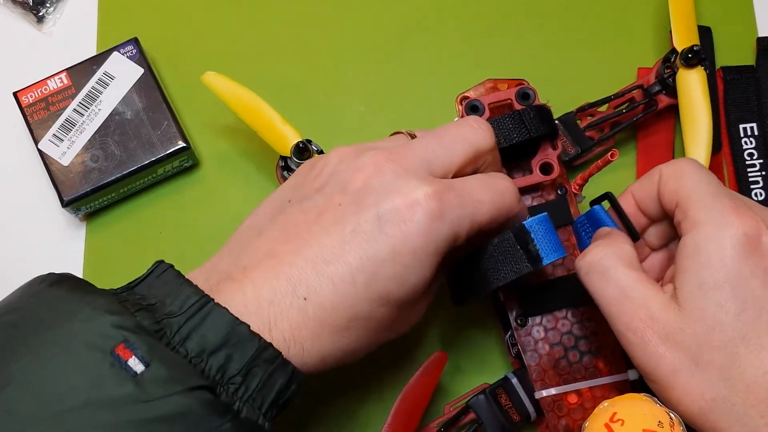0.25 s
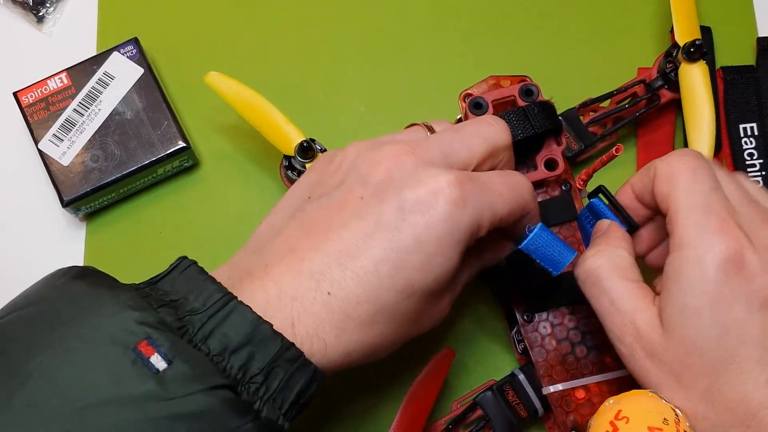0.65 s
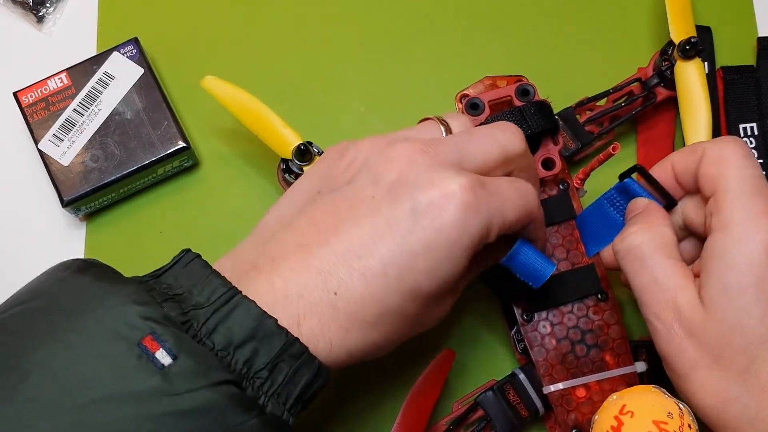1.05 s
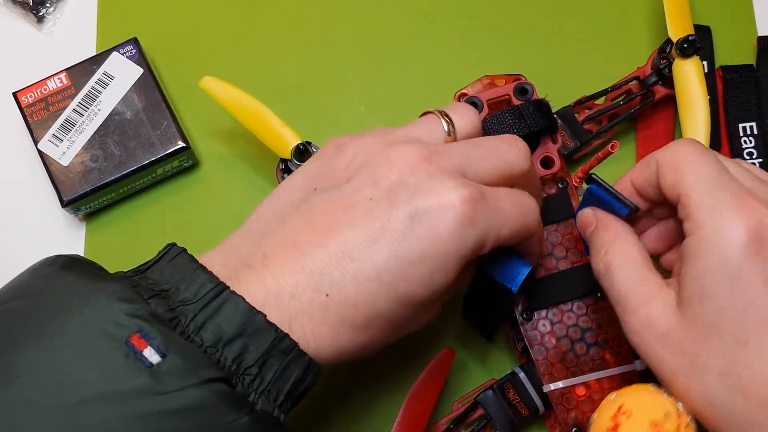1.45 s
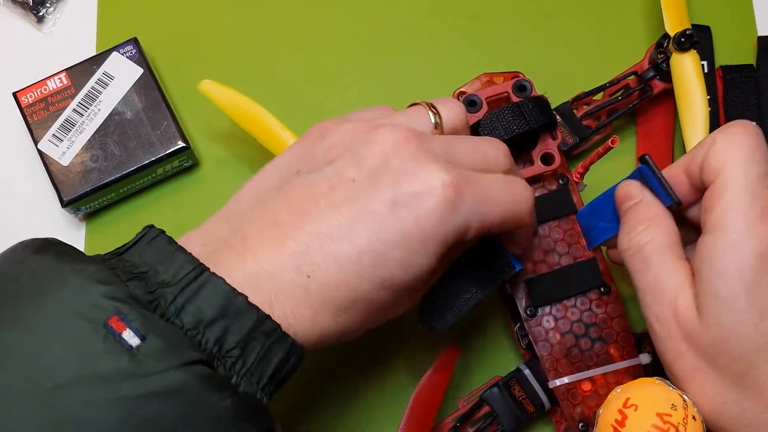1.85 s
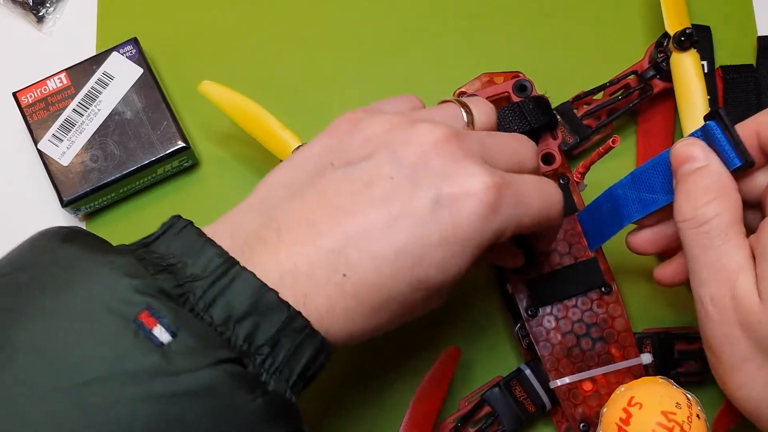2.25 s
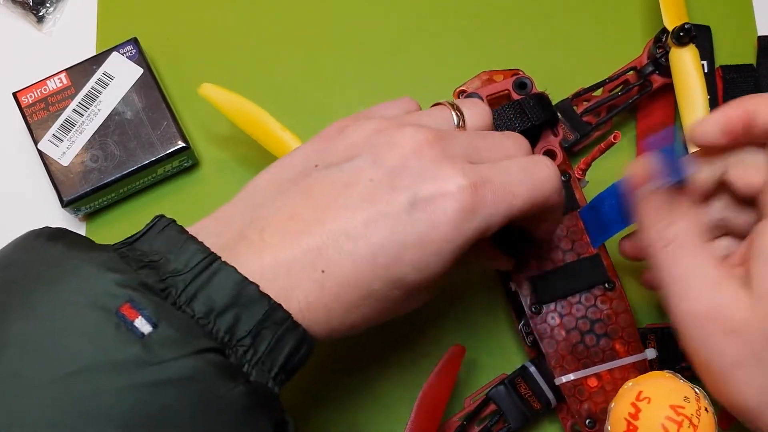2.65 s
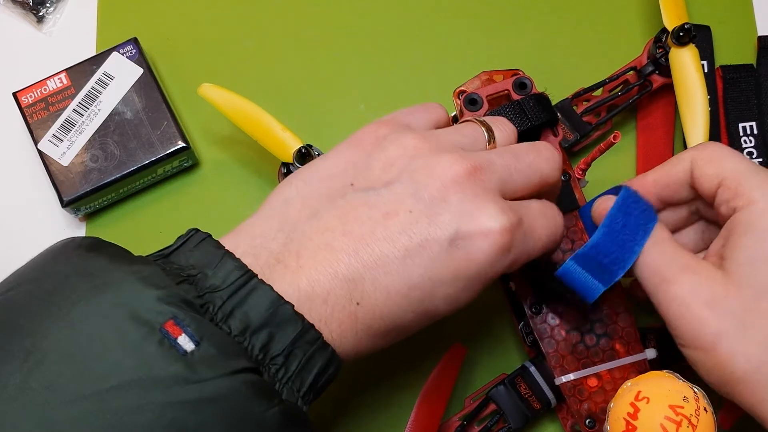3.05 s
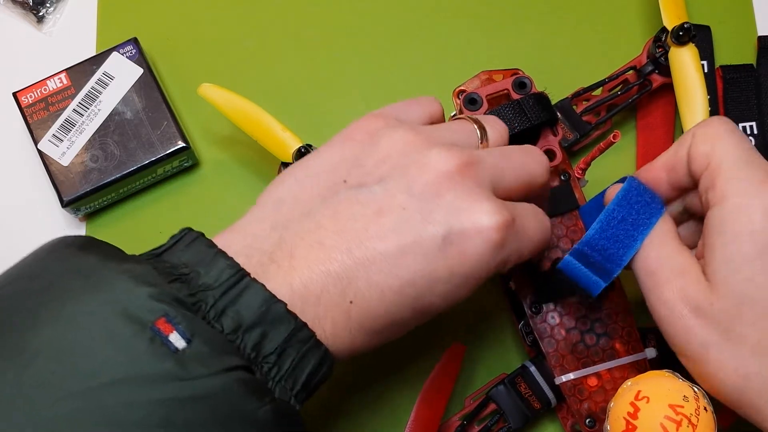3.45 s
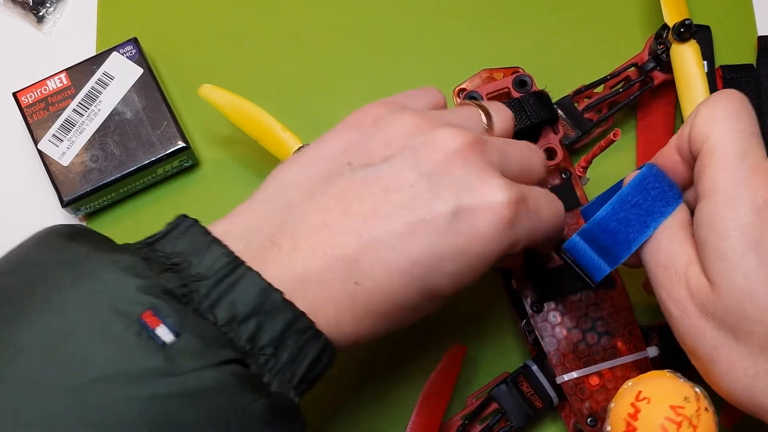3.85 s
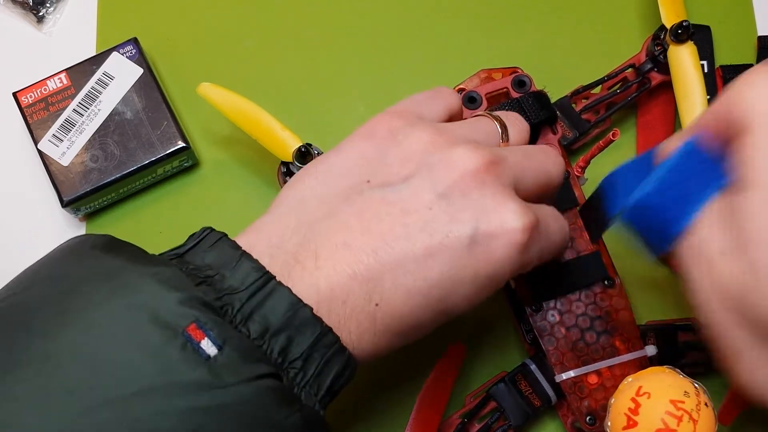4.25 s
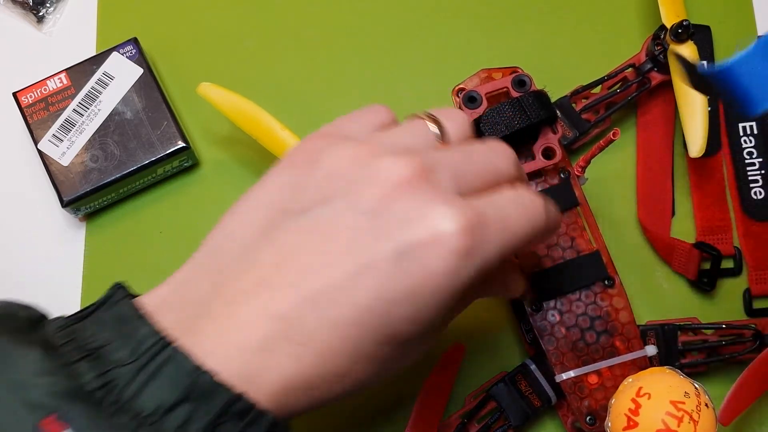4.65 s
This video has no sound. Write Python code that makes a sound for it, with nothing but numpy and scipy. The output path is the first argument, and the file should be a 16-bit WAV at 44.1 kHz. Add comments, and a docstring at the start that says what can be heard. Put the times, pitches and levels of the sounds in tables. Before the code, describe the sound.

A battery strap is peeled and drawn from a small drone frame on a desk. Faint scratchy ripping comes first, then a dense run of crackles, a short lull with plastic clicks, one loud snap, and a second run of bright rips ending hard just after four seconds. Close microphones, short room tail, faint steady background.

```python
"""On a desk in a quiet room, a hook-and-loop battery strap is peeled open and drawn out of a small drone frame.
Webbing slides as bursts of coloured noise; hooks let go singly and in rips, and each release
ticks, rings the taut strap and shakes the frame, all as filtered noise or pushes.
Tugs rock the frame as swelling sines; it knocks and clicks, once the strap end cracks free, and skin squeaks."""
import sys
import numpy as np
from scipy import signal
from scipy.fft import rfft, irfft
from scipy.io import wavfile

SR = 44100
rng = np.random.default_rng(int(sys.argv[2]) if len(sys.argv) > 2 else 0)


def waveform_to_disk(signal):
    """Save audio, clipped to [-1, 1], as 16-bit WAV at the path in sys.argv[1]."""
    frames = np.transpose(np.atleast_2d(signal))
    scaled = np.clip(frames, -1, 1) * 32767
    samples = np.round(scaled).astype(np.int16)
    wavfile.write(sys.argv[1], SR, samples)


N = 215463
TIME = np.arange(N) / SR


def from_db(db):
    """Decibels to amplitude gain."""
    return 10 ** (np.asarray(db) / 20)


def at_hz(points, hz):
    """A spectrum in dB read on a log-frequency axis."""
    known_hz, db = np.transpose(points)
    return np.interp(np.log(np.maximum(hz, 1)), np.log(known_hz), db)


def in_time(rows):
    """The columns of a curve, sample by sample."""
    s, *columns = np.transpose(rows)
    return [np.interp(TIME, s, column) for column in columns]


def response(spectrum, size=4096):
    """Causal (minimum-phase) impulse response with the given spectrum, by folding its cepstrum."""
    gain = from_db(at_hz(spectrum, np.linspace(0, SR / 2, size // 2 + 1)))
    cepstrum = irfft(np.log(gain))
    cepstrum[1:size // 2] *= 2
    cepstrum[size // 2 + 1:] = 0
    return irfft(np.exp(rfft(cepstrum)))


def through(x, impulse):
    """Convolve along time."""
    impulse = impulse if x.ndim == 1 else np.atleast_2d(impulse)
    return signal.oaconvolve(x, impulse, axes=-1)[..., :N]


def colour(x, spectrum):
    """Give white input a spectrum and keep its power."""
    impulse = response(spectrum)
    return through(x, impulse / np.linalg.norm(impulse))


# stereo spread of the two microphones: (freq_hz, side_re_mid_db)
WIDTH = [(60, -20), (100, -15), (200, -13.5), (500, -7.5), (1300, -8), (2700, -6.5), (4200, -1.5),
         (7000, -0.5), (15000, 0.5)]


def stereo_noise():
    """White noise at two microphones: alike in the bass, unrelated in the treble."""
    mid, side = rng.standard_normal((2, N))
    return mid + through(side, response(WIDTH)) * np.array([[1], [-1]])


def fade(power, decay_s):
    """Every packet of energy dies away exponentially."""
    keep = np.exp(-1 / (decay_s * SR))
    return signal.lfilter([1 - keep], [1, -keep], power + 1e-18)


def grains(per_s, spread_db):
    """Random releases of uneven energy; mean power 1."""
    uneven_db = spread_db * np.clip(rng.standard_normal(N), -2, 2)
    energy = (rng.random(N) < per_s / SR) * from_db(uneven_db) ** 2
    return energy / energy.mean()


def bursts(times_s, levels_db, decay_s):
    """Power of sudden bursts that die exponentially, cut off after 0.1 s."""
    power = np.zeros(N)
    for s, db in zip(times_s, levels_db):
        start = int(s * SR)
        age = TIME[:min(N - start, SR // 10)]
        power[start:start + len(age)] += from_db(db) ** 2 * np.exp(-age / decay_s)
    return power


def impulses(times_s, levels_db):
    """One sharp push at each time."""
    pushes = np.zeros(N)
    pushes[(np.asarray(times_s) * SR).astype(int)] = from_db(levels_db)
    return pushes


def crackle(power):
    """Broadband fibre noise that follows a power envelope."""
    return np.sqrt(np.maximum(power, 0)) * stereo_noise()


# webbing sliding under the fingers: (time_s, hiss_db, rub_db)
SLIDE = [(0, -48, -47.5), (0.22, -45, -50.5), (0.42, -40.5, -52.5), (0.5, -44.5, -61), (0.72, -50, -56.5),
         (0.87, -47, -50.5), (1.13, -44.5, -50.5), (1.22, -47.5, -52), (1.8, -46, -46.5),
         (2.23, -43.5, -59), (2.39, -58, -67), (2.54, -50, -57), (2.77, -47.5, -57), (2.92, -51, -57),
         (3.05, -50.5, -56.5), (3.45, -49.5, -61), (4.1, -54, -69), (4.4, -64, -67.5), (4.55, -43.5, -62.5),
         (4.74, -57, -62.5), (4.79, -58.5, -55), (4.88, -54.5, -51)]
# relative spectra of hiss and rub: (freq_hz, density_db)
WEBBING_HISS = [(1180, -53), (2000, -8), (2320, -9), (2910, 0.5), (3520, -3), (4690, -1), (6700, 5),
                (8930, -2.5), (14400, -9), (16000, -13.5)]
WEBBING_RUB = [(210, 1), (350, -1.5), (435, -5.5), (726, -4), (796, 0), (1630, 1.5), (2600, -7),
               (3380, -29), (5720, -120)]
# relative spectrum of the shaken frame, for hand rumble and hook releases: (freq_hz, density_db)
FRAME_SHAKE = [(55, -7), (90, 3.5), (135, -3.5), (180, 3.5), (220, -0.5), (250, -12.5), (280, -2.5),
               (340, -13.5), (400, -15), (520, -17), (660, -11.5), (850, -23.5), (1200, -52), (2000, -74)]
SCRAPES_PER_S, SCRAPE_DECAY_S, SCRAPE_SHARE = 70, 0.0069, 0.55  # share of power that comes in scrapes
RUMBLE_DB, RUMBLE_FOLLOWS = -60.5, 0.46  # hands on the frame at mean rub; dB per dB of rub swing


def sliding(fibres_per_s, spread_db, catch_s):
    """Webbing drags over frame and skin in many tiny catches; grip and slip bunch them into scrapes."""
    hiss_db, rub_db = in_time(SLIDE)
    scrapes = 1 - SCRAPE_SHARE + SCRAPE_SHARE * fade(grains(SCRAPES_PER_S, spread_db), SCRAPE_DECAY_S)
    catches = fade(scrapes * grains(fibres_per_s, spread_db), catch_s)
    hiss = from_db(hiss_db) * colour(crackle(catches), WEBBING_HISS)
    rub = from_db(rub_db) * colour(crackle(catches), WEBBING_RUB)
    rumble_db = RUMBLE_DB + RUMBLE_FOLLOWS * (rub_db - rub_db.mean())
    return hiss + rub + from_db(rumble_db) * colour(stereo_noise(), FRAME_SHAKE)


# relative spectrum of the room's background: (freq_hz, density_db)
ROOM_NOISE = [(18, -54), (30, 2), (79, -12), (145, -29), (364, -14.5), (554, -14.5), (740, -47),
              (1760, -22), (6720, -16.5), (14800, -31), (16000, -22)]
ROOM_NOISE_DB = -58


def room_noise():
    """Steady background: stereo noise with a fixed spectrum."""
    return from_db(ROOM_NOISE_DB) * colour(stereo_noise(), ROOM_NOISE)


STRAYS_PER_S, STRAY_RE_HISS_DB, STRAY_SPREAD_DB, STRAY_RING_DB = 12, 2.0, 3.5, -12.5


def stray_hooks():
    """Lone hooks catch and give at random as the webbing moves, louder with its hiss: rows like SNAPS."""
    caught = (rng.random(N) < STRAYS_PER_S / SR) & (TIME < RIPS[-1][0])
    db = in_time(SLIDE)[0] + STRAY_RE_HISS_DB + STRAY_SPREAD_DB * rng.standard_normal(N)
    return [(s, level_db, STRAY_RING_DB) for s, level_db in zip(TIME[caught], db[caught])]


# clumps of hooks letting go at once: (start_s, tick_db, ring_re_tick_db)
SNAPS = [(0.0698, -43.5, 11.5), (0.103, -33.5, 5.5), (0.2569, -34, -9.5), (0.894, -32, -16),
         (0.9221, -31, -3.5), (1.091, -33.5, -19), (1.365, -29.5, -23), (1.377, -31, -15),
         (1.402, -31, -20), (1.4208, -22, -18), (1.47, -22.5, -14.5), (1.568, -30, -32), (1.582, -25.5, -8),
         (1.636, -18.5, -4), (1.6606, -20.5, 2), (1.687, -21.5, -2.5), (1.762, -26.5, -4.5),
         (1.779, -23.5, -9), (1.798, -25.5, -2.5), (1.811, -25.5, -22), (1.829, -18.5, -9),
         (1.872, -23, -16), (1.895, -23.5, -5.5), (1.913, -23.5, -13), (1.945, -23, -5.5),
         (1.968, -27.5, -9), (1.991, -18.5, -15), (2.067, -19.5, -25), (3.039, -28, -21),
         (3.233, -31.5, -10), (3.2925, -20, -5.5), (3.334, -17.5, -9), (3.486, -31.5, -9.5),
         (3.5493, -24, -14), (3.568, -24, -6.5), (3.5962, -14.5, -17.5), (3.754, -24.5, -14.5),
         (3.7765, -14, -8), (3.8656, -21, -1.5), (3.889, -20, -14), (3.9108, -17.5, -11.5),
         (3.9304, -18, -7), (4.022, -27, -16), (4.178, -22.5, 7.5), (4.198, -16, -14), (4.208, -17.5, 3.5),
         (4.232, -15.5, -12)]
SNAP_SHAKE_DB, SHAKE_FOLLOWS = -34, 0.44  # shake at 0 dB tick; dB of shake per dB of tick


def snaps(spike_db, tick_s, spike_s, shake_s, recoil_s):
    """A clump of hooks gives with a sharp spike and a spray of ticks; the strap recoils as if plucked."""
    s, level_db, ring_db = np.transpose([*SNAPS, *stray_hooks()])
    ticks = bursts(s, level_db + spike_db, spike_s) + bursts(s, level_db, tick_s)
    # the spray's energy in one push
    plucks = impulses(s + recoil_s, level_db + ring_db) * np.sqrt(tick_s * SR)
    shakes = bursts(s, SNAP_SHAKE_DB + SHAKE_FOLLOWS * level_db, shake_s)
    return radiate(crackle(ticks), plucks, crackle(shakes))


# relative spectrum of a hook's tick: (freq_hz, density_db)
HOOK_TICK = [(1350, -33), (2300, -17.5), (2570, -13), (2890, -3.5), (3270, -9), (3630, -11.5), (4620, -5.5),
             (5160, -8), (6740, 1), (9010, -7), (12500, -11), (15000, -16)]


def radiate(tick, ring, shake):
    """A release is heard as the hook's tick, the strap's ring and the frame's shake."""
    ticks = tilted(colour(tick, HOOK_TICK), pivot_hz=6800, share=1.0)
    rings = tilted(tensioned_ring(ring), pivot_hz=1350, share=0.68)
    return ticks + rings + colour(shake, FRAME_SHAKE)


def tilted(x, pivot_hz, share):
    """Rock the spectrum about a pivot as the peel angle changes."""
    tilt_db = share * grip()[0]
    low = signal.sosfiltfilt(signal.butter(2, pivot_hz, fs=SR, output="sos"), x)
    return low * from_db(-tilt_db / 2) + (x - low) * from_db(tilt_db / 2)


def tensioned_ring(x):
    """A tighter strap rings higher: its modes run on a clock that follows the tension."""
    clock = np.cumsum(2 ** (grip()[1] / 12))
    clock *= (N - 1) / clock[-1]  # same total length, so pitch is relative to the mean rate
    ticks = np.round(clock).astype(int)
    pushes = np.array([np.bincount(ticks, channel, N) for channel in np.atleast_2d(x)])
    return np.array([np.interp(clock, np.arange(N), channel) for channel in strap_ring(pushes)])


# broad and narrow resonances of the taut strap, relative levels: (freq_hz, width_hz, gain_db)
STRAP_MODES = [(1053, 165, 5.5), (1188, 332, 2.5), (1292, 22, 9.5), (1494, 430, 3), (1458, 124, 10),
               (1522, 166, 1), (1887, 452, -5.5), (1869, 92, 3.5), (2915, 38, -5.5)]
STRAP_LOW_CUT_HZ = 684


def strap_ring(x, size=2048):
    """The strap rings in a few decaying modes of alternating sign and radiates little below them."""
    age = TIME[:size]
    impulse = np.zeros(size)
    for k, (hz, width_hz, db) in enumerate(STRAP_MODES):
        decay = width_hz * np.exp(-np.pi * width_hz * age)
        impulse += (-1) ** k * from_db(db) * decay * np.cos(2 * np.pi * hz * age)
    low_cut = signal.butter(2, STRAP_LOW_CUT_HZ, "high", fs=SR, output="sos")
    impulse = signal.sosfilt(low_cut, impulse)
    return through(x, impulse / np.linalg.norm(impulse))


def grip():
    """Tilt (dB) and relative pitch (semitones), gliding between rips as peel angle and tension change."""
    return in_time([(start + length / 2, bright_db, pitch) for start, length, *_, bright_db, pitch in RIPS])


# stretches of strap torn open; levels at the hardest pull, ring halfway through its slackening:
# (start_s, length_s, crackle_db, ring_re_crackle_db, shake_db, brightness_db, relative_pitch_semitones)
RIPS = [(0.085, 0.079, -33.5, -3, -44, -7.5, -1), (0.505, 0.016, -42, 0.5, -67, 2, -1),
        (0.936, 0.059, -30, -5.5, -46.5, -0.5, -0.5), (1.388, 0.097, -32, -9.5, -45.5, 6.5, -1),
        (1.667, 0.036, -27, -4, -43, -3.5, 0.17), (1.749, 0.068, -32.5, -18, -40.5, 4, 0),
        (1.904, 0.09, -35.5, -10, -41, 1.5, 0.5), (2.006, 0.084, -19, -2.5, -34, -9.5, -1.4),
        (2.826, 0.056, -38.5, -6, -49.5, 3, 0.5), (3.001, 0.035, -37, -22, -51, 0.5, -0.39),
        (3.19, 0.04, -39, -10, -53, 1.5, 0.5), (3.289, 0.073, -22.5, -7.5, -35, 0.5, 0.5),
        (3.604, 0.07, -25, -8.5, -37.5, 0, 1), (3.765, 0.028, -35, -7, -65, -0.5, -0.7),
        (3.898, 0.075, -24.5, -9.5, -37.5, 0, -1.5), (4.004, 0.014, -28.5, -23, -50, 2.5, -0.4),
        (4.12, 0.053, -34, -9.5, -39, 1, -0.77), (4.179, 0.069, -17, -5, -32, -4, 1.2)]
RIP_SWELL_DB, RIP_PEAK_SHARE, RIP_EASE_DB = 4.5, 0.566, 6
SLACKEN_DB = 10.5  # loss of ring from start to end of a rip


def rips(hooks_per_s, spread_db, tick_s, let_go_s):
    """The peel line tears out hooks in uneven succession; pull swells and eases, ring fades with slack."""
    pull = np.zeros((3, N))
    for start, length, db, ring_db, shake_db, *_ in RIPS:
        progress = (TIME - start) / length
        peeling = (progress >= 0) & (progress <= 1)
        along = progress[peeling]
        effort_db = np.interp(along, [0, RIP_PEAK_SHARE, 1], [-RIP_SWELL_DB, 0, -RIP_EASE_DB])
        ring = db + effort_db + ring_db - SLACKEN_DB * (along - .5)
        pull[:, peeling] += from_db([db + effort_db, ring, shake_db + effort_db / 2]) ** 2
    hooks = grains(hooks_per_s, spread_db)  # the same hooks drive all three
    releases = fade(fade(pull, let_go_s) * hooks, tick_s)
    return radiate(*[crackle(power) for power in releases])


# tugs that rock the frame on the desk and flex its arms: (start_s, rocking_db, flexing_db)
TUGS = [(0.094, -36, -45), (0.99, -38.5, -48), (1.437, -33.5, -39.5), (1.63, -36.5, -42), (1.763, -35, -35),
        (1.891, -32.5, -39.5), (1.974, -49, -31), (2.868, -37, -56), (3.19, -45, -47), (3.229, -42, -38.5),
        (3.297, -37, -28), (3.333, -34, -40), (3.422, -41, -44), (3.612, -33, -39), (3.648, -29.5, -39),
        (3.9, -25, -38), (3.94, -35, -33), (4.118, -48, -40), (4.209, -52, -31)]
# rocking and flexing mode: (freq_hz, swell_s)
ROCK_MODES = [(91, 0.014), (186, 0.0091)]


def rocking():
    """Each tug is a soft push that swells and dies within a few cycles of the frame's low modes."""
    s, *levels_db = np.transpose(TUGS)
    age = TIME[:SR // 4]
    total = np.zeros(N)
    for db, (hz, swell_s) in zip(levels_db, ROCK_MODES):
        swell = age / swell_s * np.exp(1 - age / swell_s)
        total += through(impulses(s, db), swell * np.sin(2 * np.pi * hz * age))
    return total


# frame knocking on the desk: (start_s, thud_db, clack_db, second_foot_delay_s)
KNOCKS = [(0.579, -32.5, -21.5, 0.0033), (2.43, -30, -25, 0.003), (3.906, -40, -28.5, 0.00301)]
# modes of the frame on the desk top: (freq_hz, gain_db, t60_s)
DESK_MODES = [(97.3, -2, 0.18), (151, -8.5, 0.18), (172.4, 0, 0.1), (198.6, -10.5, 0.15),
              (270.7, -15, 0.21), (414, -17, 0.049), (463, 0.5, 0.065), (520, 1, 0.067), (647, -2, 0.079),
              (770, -7, .05), (945, -26, 0.033)]
# relative spectrum of the plastic clack: (freq_hz, density_db)
CLACK_COLOUR = [(180, -18), (300, -9), (680, -3.5), (1150, -16.5), (1800, -10), (2270, -19), (2770, -14.5),
                (4750, -17), (5550, -19.5), (12000, -35), (15600, -53), (22000, -120)]


def knocks(clack_s, rattle_s, contact_s, settle_db):
    """The frame drops one foot after the other: a plastic clack over the low modes of the desk top."""
    s, thud_db, clack_db, delay_s = np.transpose(KNOCKS)
    blows = impulses(s, thud_db) + impulses(s + delay_s, thud_db + settle_db)
    age = TIME[:SR // 2]
    desk = np.zeros(len(age))
    for hz, db, t60_s in DESK_MODES:
        desk += from_db(db) * np.exp(-np.log(1000) * age / t60_s) * np.cos(2 * np.pi * hz * age)
    rattle = fade(bursts(s, clack_db, clack_s), rattle_s)
    return through(fade(blows, contact_s), desk) + colour(crackle(rattle), CLACK_COLOUR)


# buckle and strap edge clicking on the frame: (start_s, level_db)
CLICKS = [(1.47, -19), (2.262, -26), (2.3291, -24.5), (2.3497, -24.5), (2.404, -33), (4.6457, -35)]
# relative spectrum of a click: (freq_hz, density_db)
CLICK_COLOUR = [(1180, -39), (2000, -19), (2280, -56), (2530, -13), (2740, -19.5), (4120, -22.5),
                (6420, 1.5), (14900, -31), (16000, -37)]


def clicks(click_s):
    """Hard plastic touches the frame: a thin, high noise burst."""
    s, level_db = np.transpose(CLICKS)
    return colour(crackle(bursts(s, level_db, click_s)), CLICK_COLOUR)


# strap end cracking free: (start_s, level_db)
CRACK = [(2.7856, -8.5)]
# relative spectrum of the crack: (freq_hz, density_db)
CRACK_COLOUR = [(410, -40), (700, -19), (1110, -24), (1330, -5.5), (1600, -6.5), (2080, -18.5), (3070, 1.5),
                (3790, -14), (4100, -4.5), (4610, -6), (7290, -0.5), (9230, -8.5), (11100, -7),
                (15400, -21), (16000, -7)]


def crack(crack_s, trail_db, trail_s):
    """The strap end whips out of its slot: a sharp noise burst over a weaker, longer one."""
    s, level_db = np.transpose(CRACK)
    power = bursts(s, level_db, crack_s) + bursts(s, level_db + trail_db, trail_s)
    return colour(crackle(power), CRACK_COLOUR)


# faint squeaks as the hand lifts off the frame: (start_s, level_db, start_pitch_hz)
SQUEAKS = [(4.735, -58, 5000), (4.832, -53, 4580), (4.866, -53, 6000)]
SQUEAK_SWELL_S, SQUEAK_SAG_HZ_PER_S = 0.011, 3000


def squeaks():
    """Skin slips on smooth plastic: a thin tone that swells, sags and dies."""
    age = TIME[:SR // 8]
    swell = age / SQUEAK_SWELL_S * np.exp(1 - age / SQUEAK_SWELL_S)
    total = np.zeros(N)
    for s, db, hz in SQUEAKS:
        cycles = (hz - SQUEAK_SAG_HZ_PER_S * age / 2) * age
        total += through(impulses([s], db), swell * np.sin(2 * np.pi * cycles))
    return total


def room(x, near_db, near_s, tail_db, t60_s, gap_s):
    """Scatter from the desk and things on it, then the short tail of a small room."""
    age = TIME[:SR // 2]
    near = stereo_noise()[:, :len(age)] * np.exp(-age / near_s) * (age > gap_s)
    tail = stereo_noise()[:, :len(age)] * np.exp(-np.log(1000) * age / t60_s) * (age > 2 * gap_s)
    near *= from_db(near_db) / np.linalg.norm(near[0])
    tail *= from_db(tail_db) / np.linalg.norm(tail[0])
    return x + through(x, near + tail)


def scene():
    """Strap and frame close to the microphones, in a quiet room."""
    dry = sliding(fibres_per_s=540, spread_db=0.5, catch_s=0.0046)
    dry += snaps(spike_db=-6.5, tick_s=0.004, spike_s=0.00015, shake_s=0.0098, recoil_s=0.00128)
    dry += rips(hooks_per_s=520, spread_db=2.0, tick_s=0.0012, let_go_s=0.0016)
    dry += rocking()
    dry += knocks(clack_s=0.005, rattle_s=0.0013, contact_s=0.0006, settle_db=10.5)
    dry += clicks(click_s=0.0024)
    dry += crack(crack_s=0.0016, trail_db=-13.5, trail_s=0.011)
    dry += squeaks()
    heard = room(dry, near_db=-12.0, near_s=0.015, tail_db=-9.5, t60_s=0.21, gap_s=0.0038)
    return heard + room_noise()


# balance of the two microphone ports: (freq_hz, left_re_right_db)
LEAN = [(60, -2.5), (140, -2), (400, -0.5), (3600, -.5), (4500, 0.5), (5500, 1.5), (6400, 6.5), (7300, 6.5),
        (8200, -2.5), (10000, -2.5), (15000, -3)]
LOW_CUT_HZ, CUTOFF_HZ = 65, 15600


def record(dry):
    """Each microphone port has its own colour; the deep bass rolls off, peaks are rounded, the top is cut."""
    ports = []
    for x, side in zip(dry, (1, -1)):
        port_colour = [(hz, side * db / 2) for hz, db in LEAN]
        ports.append(through(x, response(port_colour)))
    low_cut = signal.butter(3, LOW_CUT_HZ, "high", fs=SR, output="sos")
    ports = signal.sosfilt(low_cut, np.array(ports))
    rounded = 1.05 * np.tanh(ports / 1.05)
    top_cut = signal.ellip(10, 0.2, 80, CUTOFF_HZ, fs=SR, output="sos")
    return signal.sosfilt(top_cut, rounded)


dry = scene()
out = record(dry)
waveform_to_disk(out)
```